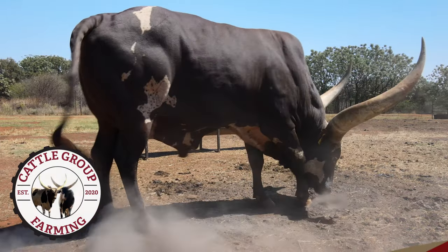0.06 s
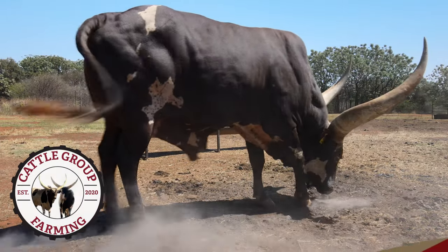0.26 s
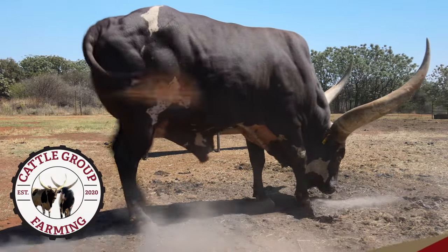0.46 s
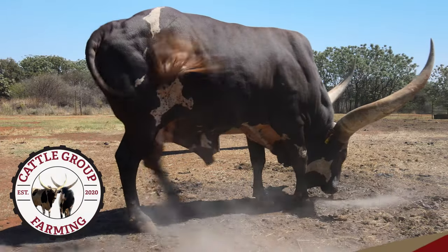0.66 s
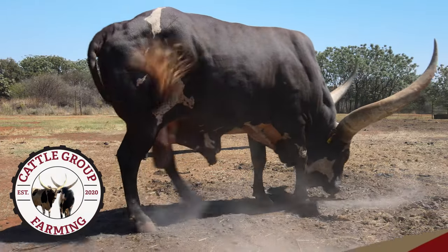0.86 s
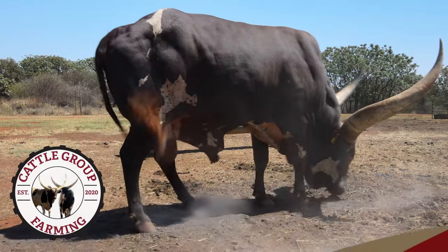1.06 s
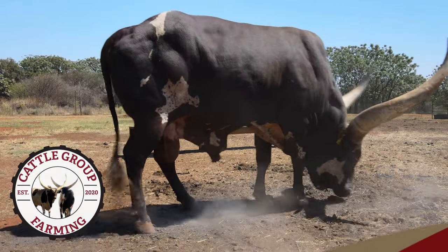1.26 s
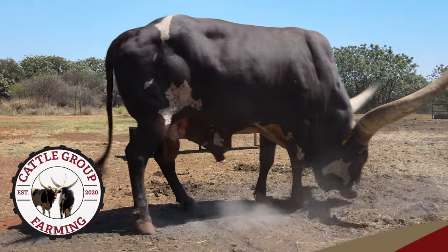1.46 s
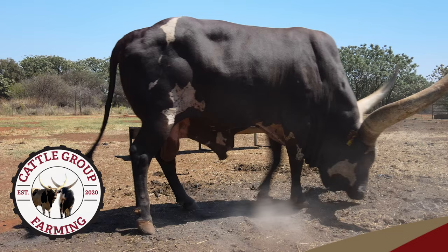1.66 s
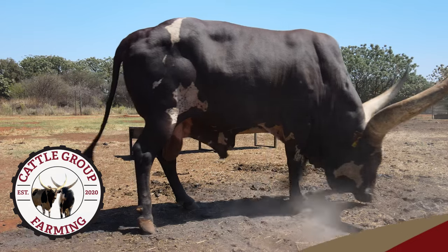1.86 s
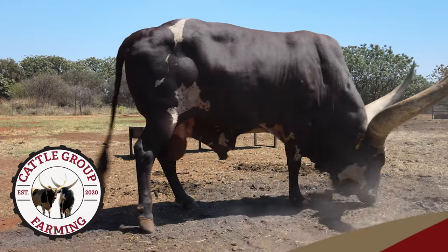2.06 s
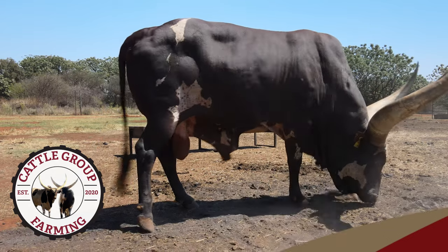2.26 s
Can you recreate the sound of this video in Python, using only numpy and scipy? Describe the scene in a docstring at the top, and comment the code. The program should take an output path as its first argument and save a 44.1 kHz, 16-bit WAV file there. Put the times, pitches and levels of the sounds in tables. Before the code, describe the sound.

A bull bellows once straight ahead of the microphone, rising in pitch and turning rough before dropping off with a slight echo. Quiet hoof scrapes, ticks of grit and a few far-off chirps follow in the outdoor pen.

```python
"""An open, dusty pen: a long-horned bull bellows once, head down, while pawing the ground.
Pulses from his vocal folds excite the resonances of throat and muzzle. The call starts as a closed-mouth
hum, opens and rises, breaks into a growl as the folds fall out of step, rings clear, then drops and
cracks. Fence and trees reflect it. Hooves scuff dirt and flick grit in many small impacts;
small birds chirp far off over the outdoor air and a low hum."""
import sys
import numpy as np
from scipy import signal
from scipy.fft import rfft, irfft
from scipy.io import wavfile
from scipy.ndimage import uniform_filter1d, minimum_filter1d

SR = 44100
rng = np.random.default_rng(int(sys.argv[2]) if len(sys.argv) > 2 else 0)


def dump_mix(stems):
    """Bounce the given channels to the path in sys.argv[1] as a 16-bit WAV at rate SR."""
    frames = np.atleast_2d(stems).T  # one column per channel
    limited = np.clip(frames, -1, 1)  # hard clip at full scale
    pcm = np.round(limited * 32767).astype(np.int16)
    wavfile.write(sys.argv[1], SR, pcm)


N = 105840
T = np.arange(N) / SR
FREQS = np.maximum(np.arange(4097) * SR / 8192, 1)

# Vibration rate of the vocal folds: time_s, pitch_hz
FOLD_PITCH = [(0, 88), (.05, 101), (.14, 111), (.18, 111), (.245, 118), (.31, 132), (.38, 143),
              (.44, 141.5), (.5, 156), (.55, 159), (.64, 159), (.72, 163.5), (.785, 167.3), (.825, 164.5),
              (.85, 156), (.872, 133), (.915, 129), (.97, 92)]
# Vocal effort: time_s, level_db
VOCAL_EFFORT = [(0, -7), (.07, -4.5), (.12, -1.5), (.198, -3.5), (.21, -1), (.28, -2), (.37, -1.5),
                (.45, 0), (.58, 3.5), (.66, 0), (.86, 1), (.9, 1), (.925, -12), (.95, -16.5), (1, -43)]
# How far the folds fall out of step: time_s, roughness (0 to 1)
FOLD_ROUGHNESS = [(0, 1), (.06, .7), (.11, .2), (.2, .17), (.28, .1), (.435, .07), (.47, .4), (.5, .9),
                  (.58, .95), (.615, .18), (.68, .05), (.82, .04), (.845, .15), (.87, .5), (.94, .5)]
# Mouth movement: time_s, opening (0 shut, 1 ajar, 2 half open, 3 open, 4 wide)
MOUTH_OPENING = [(0, 0), (.196, 0), (.202, .9), (.24, 1), (.37, 2), (.43, 2), (.5, 2.35), (.58, 2.5),
                 (.62, 3), (.67, 3), (.76, 4), (.82, 4), (.85, 3), (.88, 2.4), (.95, 2.5)]
# Resonances of throat and muzzle: centre_hz, width_hz, shut_db, ajar_db, half_open_db, open_db, wide_db
FORMANTS = [(155, 39.7, -17.5, -16.5, -15, -24.5, -22.5), (254.3, 87.6, -31.5, -20, -16.5, -14, -14),
            (471.3, 27, -34.5, -33.5, -19, -25, -23.5), (548.3, 28.5, -31, -28, -20.5, -17, -66),
            (657.3, 45, -37.5, -37, -25, -21.5, -20.5), (862, 60, -40, -31.5, -34.5, -40, -23),
            (951, 76, -57, -26, -21.5, -18.5, -15), (1186, 100, -73, -31.5, -37, -37.5, -41),
            (1270, 182, -41, -35.5, -21, -20.5, -18.5), (1485, 85, -34, -35, -27, -26.5, -29),
            (1649, 43, -60, -33.5, -26, -29, -23), (1776, 51, -72, -73, -61, -31.5, -26.5),
            (2074, 200, -55, -71, -39, -29, -63), (2228, 89, -47.5, -41, -30.5, -53, -25),
            (2634, 263, -101, -51.5, -41.5, -42, -43.5), (2995, 68, -95, -87, -63, -41, -44),
            (3584, 235, -101, -87, -80, -54.5, -48.5), (4230, 280, -106, -92, -64, -58.5, -58)]
# Tuning of those resonances at each opening, shut to wide: frequency_ratio
FORMANT_TUNING = [0.992, 0.988, 1.001, .99, 0.992]
# Bands that the long throat and muzzle delay: centre_hz, width_hz
DELAYED_BANDS = [(700, 220), (1050, 250), (1100, 320), (1270, 320), (1450, 320), (2600, 400), (3600, 350)]
# Reflections from fence and trees: delay_s, level_db
PEN_ECHOES = [(.075, -24), (.16, -25)]
# Drags of a hoof: centre_s, half_length_s, level_db
HOOF_SCUFFS = [(0.462, .05, -39.5), (0.551, 0.025, -39), (1.297, 0.069, -43), (1.603, 0.026, -44.5),
               (1.847, 0.077, -43.5), (2.005, 0.082, -43), (2.181, 0.055, -41), (2.335, 0.084, -46.5)]
# Spectrum of scuffed dirt: frequency_hz, relative_db
DIRT_SPECTRUM = [(60, -17), (350, 8.5), (1100, -0.5), (1800, -6.5), (3000, 1), (5000, -9.5), (9000, -11.5),
                 (15000, -24)]
# Impacts of flicked grit: start_s, level_db, decay_s
GRIT_FLICKS = [(.017, -42, .003), (.0445, -30, .003), (.271, -47, .006), (.444, -43, .004),
               (.999, -46, .003), (1.966, -49, .005), (2.205, -50, .005)]
# Spectrum of a grit impact: frequency_hz, relative_db
GRIT_SPECTRUM = [(300, -20), (1500, -12), (3300, 0), (5000, -5), (7500, -4), (9500, -15), (15000, -23)]
# Distant bird calls: centre_s, half_length_s, pitch_hz, level_db
BIRD_CHIRPS = [(.45, .04, 3950, -55), (.57, .03, 3950, -53), (1.44, .04, 4020, -52),
               (1.975, .022, 3820, -44), (2.0, .06, 3200, -50)]
# Spectrum of the outdoor air: frequency_hz, relative_db
AIR_SPECTRUM = [(15, 16), (25, -9), (99, -1), (126, 0.5), (152, -7), (215, 0.5), (289, -9.5), (359, -0.5),
                (598, -11), (1110, -9.5), (1660, -14), (3820, -17.5), (4490, -21), (7700, -24.5),
                (15500, -32)]
# Stereo width of air and scuffs: frequency_hz, side_minus_mid_db
STEREO_WIDTH = [(30, -4.5), (300, -3), (1200, -3), (3000, -0.5), (6000, -0.5), (15000, -1.5)]
# Envelope of the low hum: time_s, level_db
HUM_LEVEL = [(0, -45), (.5, -43), (1.05, -46), (1.25, -57), (2.4, -54)]


def bellow():
    """Source and filter: fold pulses excite throat resonances that change as the mouth opens."""
    low_cut_hz, high_cut_hz = 114, 4600
    source, mouth, voice = vocal_folds(), curve(MOUTH_OPENING), 0
    passband = 1 / np.sqrt((1 + (low_cut_hz / FREQS) ** 10) * (1 + (FREQS / high_cut_hz) ** 10))
    for opening, tuning in enumerate(FORMANT_TUNING):
        throat = sum(undb(db[opening]) * resonance(hz * tuning, width) for hz, width, *db in FORMANTS)
        crossfade = np.maximum(1 - abs(mouth - opening), 0)
        voice += colour(source * crossfade, throat * passband)
    for hz, width in DELAYED_BANDS:  # all-pass dispersion smears each pulse
        voice -= 2 * signal.lfilter(*signal.iirpeak(hz, hz / width, fs=SR), voice)
    return voice


def vocal_folds():
    """Glottal pulses with puffs of rasp; in the growl, period tripling favours every third pulse."""
    growl_db, shimmer_db, growl_lag_s, jitter_s = 5.5, 1.2, .00032, .00014
    rasp_db, growl_rasp_db, rasp_decay_cycles, rasp_cut_hz = -27, -9, .35, 600
    pitch_hz, end_s = curve(FOLD_PITCH), VOCAL_EFFORT[-1][0]
    cycles = np.cumsum(pitch_hz) / SR
    pulse_numbers = np.arange(1, int(np.interp(end_s, T, cycles)))
    times = np.interp(pulse_numbers, cycles, T)
    roughness = curve(FOLD_ROUGHNESS, times)
    shimmer, jitter = rng.standard_normal((len(times), 2)).T
    subharmonic = 2 * np.pi * pulse_numbers / 3
    pulse_db = roughness * (growl_db * (np.cos(subharmonic) - 1.5) + shimmer_db * shimmer)
    lag_s = roughness * (growl_lag_s * np.sin(subharmonic) + jitter_s * jitter)
    pulses = impulses(times + lag_s, SR / curve(FOLD_PITCH, times) * undb(pulse_db))
    puffs = unit(np.exp(-(cycles % 1) / rasp_decay_cycles) * noise()) * np.sqrt(SR / pitch_hz)
    rasp = colour(puffs, FREQS / np.hypot(FREQS, rasp_cut_hz))
    rasp *= undb(rasp_db) + undb(growl_rasp_db) * curve(FOLD_ROUGHNESS)
    return (pulses + rasp) * undb(curve(VOCAL_EFFORT)) * (T < end_s)


def grumble():
    """Random frequency modulation unsteadies a short low tone at the onset of the call."""
    tone = unit(np.sin(phase_of(134 * (1 + .17 * wander(rate_hz=90)))))
    attack = np.minimum(T / .0044, 1)
    return undb(-32) * tone * attack * swell(centre_s=.01, half_length_s=.053)


def pen_reflections(call):
    """Reflection: the ground scatters the call faintly; fence and trees return band-limited echoes."""
    t60_s, scatter_delay_s, scatter_db = .4, .033, -22
    decay = undb(-60 * T / t60_s) * (T > scatter_delay_s)
    scatter = undb(scatter_db) * unit(decay * noise()) / np.sqrt(N)
    delays, db = np.array(PEN_ECHOES).T
    echoes = colour(impulses(delays, undb(db)), resonance(centre_hz=700, width_hz=400))
    return signal.fftconvolve(call, scatter + echoes)[:N]


def hoof_scuffs():
    """Granular friction: under a dragging hoof, dense random impacts of dry dirt merge into noise."""
    def grains(per_s=4000, spread_db=3):
        hits = (rng.random(N) < per_s / SR) * noise()
        sizes = undb(spread_db * np.minimum(rng.exponential(size=N), 5))
        return unit(colour(hits * sizes, spectrum(DIRT_SPECTRUM)))
    drag = sum(undb(db) * swell(centre, half_length) for centre, half_length, db in HOOF_SCUFFS)
    return drag * stereo(grains(), colour(grains(), spectrum(STEREO_WIDTH)))


def flicked_grit():
    """Damped impacts: each bit of grit gives a bright crack that decays exponentially."""
    envelope = sum(undb(db) * (T >= start) * np.exp(-abs(T - start) / decay)
                   for start, db, decay in GRIT_FLICKS)
    mid, side = (unit(colour(noise(), spectrum(GRIT_SPECTRUM))) for _ in range(2))
    return envelope * stereo(mid, undb(-7) * side)


def birds():
    """Frequency modulation, independent at each ear, blurs thin chirps so that they sound distant."""
    waver, octave_above_hz, octave_db = .016, 3500, -6
    chirps = np.zeros((2, N))
    for centre, half_length, hz, db in BIRD_CHIRPS:
        for ear in range(2):
            phase = phase_of(hz * (1 + waver * wander(rate_hz=500)))
            octave = undb(octave_db) * np.sin(2 * phase) * (hz > octave_above_hz)
            chirps[ear] += undb(db) * swell(centre, half_length) * (np.sin(phase) + octave)
    return chirps


def outdoor_air():
    """Amplitude modulation: octave bands of noise flicker independently; the treble is widest."""
    level_db, swell_db, flicker_db = -41, .3, 1.1

    def band(centre_hz):
        gain = spectrum(AIR_SPECTRUM) * np.exp(-np.log2(FREQS / centre_hz) ** 2)
        return undb(flicker_db * wander(rate_hz=14)) * colour(noise(), gain)
    mid, side = (unit(sum(band(hz) for hz in 2. ** np.arange(5, 15))) for _ in range(2))
    wash = stereo(mid, colour(side, spectrum(STEREO_WIDTH)))
    return wash * undb(level_db + swell_db * wander(rate_hz=7.5))


def low_hum():
    """Random modulation of pitch and level spreads a low tone into a narrow band."""
    pitch_hz, spread_hz, spread_db = 57.7, 3.5, 2
    tone = unit(np.sin(phase_of(pitch_hz + spread_hz * wander(rate_hz=20))))
    return tone * undb(curve(HUM_LEVEL) + spread_db * wander(rate_hz=4))


def undb(db):
    """Decibels to amplitude ratio."""
    return 10 ** (np.asarray(db) / 20)


def unit(x):
    """Normalisation to rms 1."""
    return x / np.sqrt(np.mean(x ** 2))


def noise():
    """Gaussian white noise."""
    return rng.standard_normal(N)


def wander(rate_hz):
    """Smoothed random steps with rms 1."""
    hold = int(SR / rate_hz)
    steps = np.repeat(rng.standard_normal(N // hold + 1), hold)
    return unit(uniform_filter1d(steps, hold)[:N])


def phase_of(hz):
    """Phase in radians as the integral of frequency."""
    return 2 * np.pi * np.cumsum(hz) / SR


def curve(rows, at=T):
    """Linear interpolation of (time_s, value) rows."""
    return np.interp(at, *np.array(rows).T)


def swell(centre_s, half_length_s):
    """Gaussian envelope."""
    return np.exp(-((T - centre_s) / half_length_s) ** 2)


def resonance(centre_hz, width_hz):
    """Lorentzian peak of gain over frequency."""
    return 1 / (1 + (2 * (FREQS - centre_hz) / width_hz) ** 2)


def spectrum(rows):
    """Gain interpolated over log frequency from (frequency_hz, level_db) rows."""
    hz, db = np.array(rows).T
    return undb(np.interp(np.log(FREQS), np.log(hz), db))


def colour(x, gain):
    """Minimum-phase filter: folding the cepstrum makes the given gain curve causal."""
    cepstrum = irfft(np.log(gain + 1e-7))
    half = len(cepstrum) // 2
    cepstrum[1:half] *= 2
    cepstrum[half + 1:] = 0
    return signal.fftconvolve(x, irfft(np.exp(rfft(cepstrum))))[:N]


def impulses(times, sizes, order=8):
    """Windowed sinc interpolation places band-limited impulses between samples."""
    position = times[:, None] * SR
    index = position.astype(int) + np.arange(-order, order + 1)
    offset = index - position
    kernels = np.sinc(offset) * np.sinc(offset / (order + 1))
    train = np.zeros(N)
    np.add.at(train, np.clip(index, 0, N - 1), sizes[:, None] * kernels)
    return train


def stereo(mid, side):
    """Left and right as the sum and difference of mid and side."""
    return np.array([mid + side, mid - side])


def scene():
    """Superposition: the bull straight ahead, the pen around him."""
    call = bellow() + grumble()
    return call + pen_reflections(call) + hoof_scuffs() + flicked_grit() + birds() + outdoor_air() + low_hum()


def record(dry):
    """Peak limiting ducks the highest peaks; a steep low-pass cuts the top of the treble."""
    ceiling, top_hz = .97, 15700
    safe_gain = np.minimum(1, ceiling / (abs(dry).max(axis=0) + 1e-9))
    held = minimum_filter1d(safe_gain, size=400)
    gain = uniform_filter1d(uniform_filter1d(held, size=200), size=200)
    return signal.sosfilt(signal.ellip(12, .2, 90, top_hz, fs=SR, output="sos"), dry * gain)


dry = scene()
out = record(dry)
dump_mix(out)
```